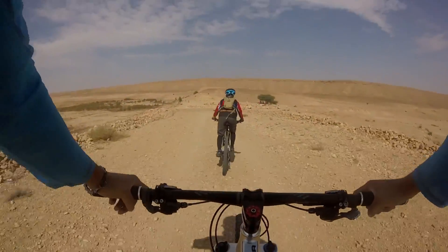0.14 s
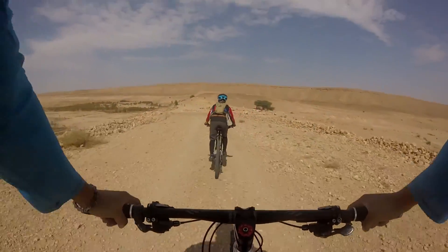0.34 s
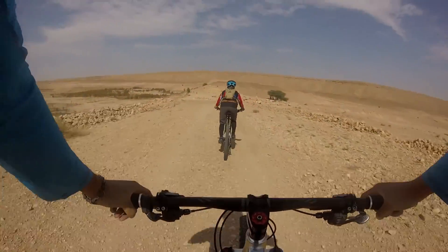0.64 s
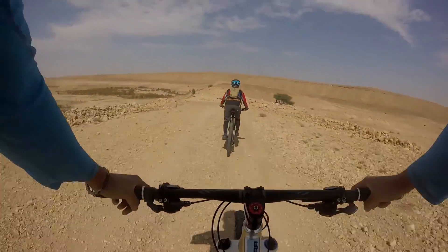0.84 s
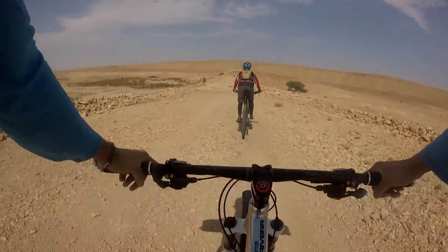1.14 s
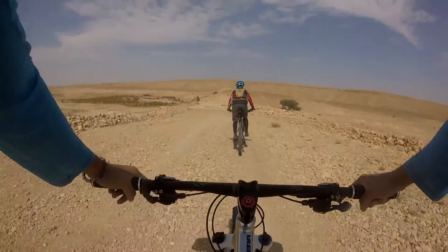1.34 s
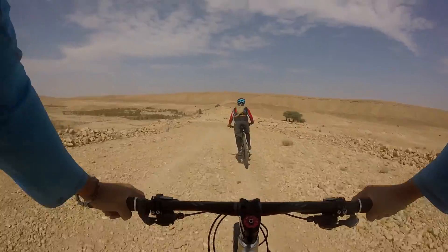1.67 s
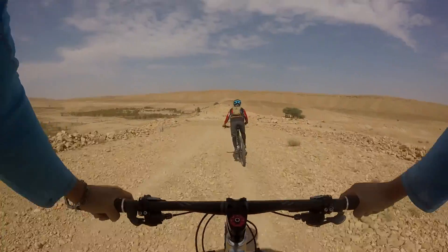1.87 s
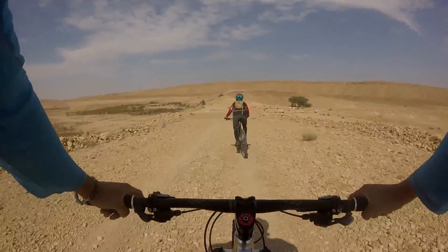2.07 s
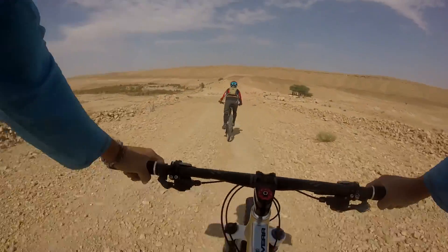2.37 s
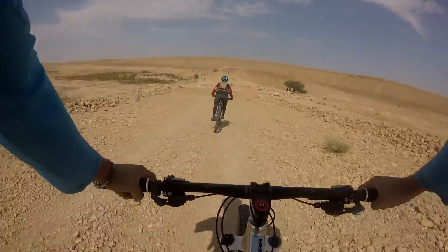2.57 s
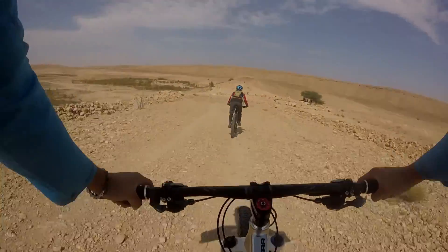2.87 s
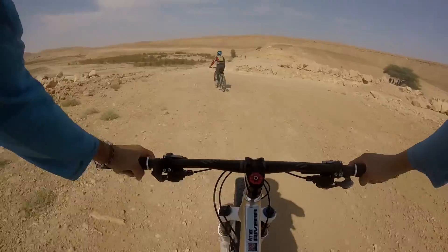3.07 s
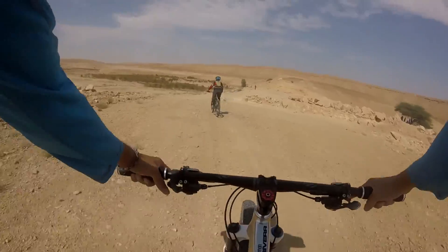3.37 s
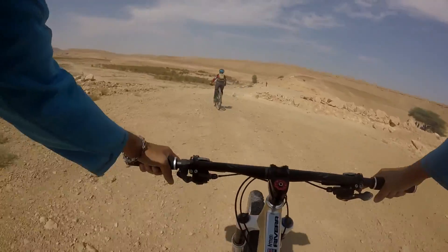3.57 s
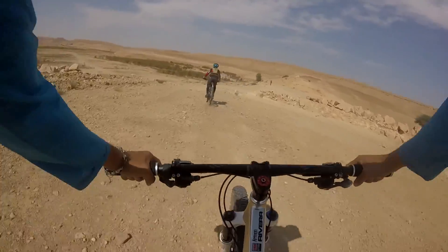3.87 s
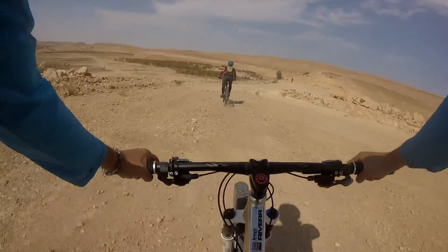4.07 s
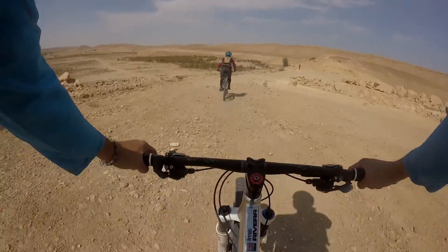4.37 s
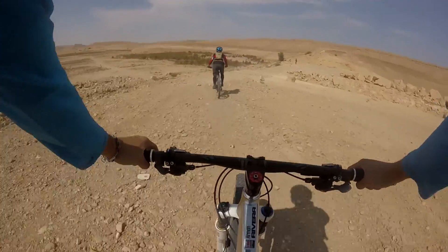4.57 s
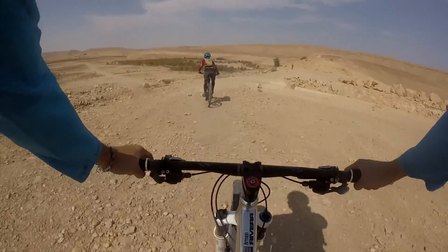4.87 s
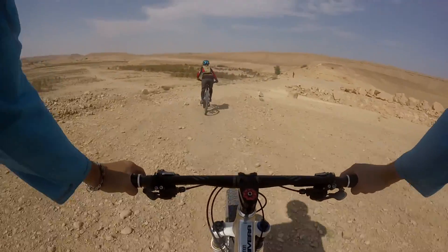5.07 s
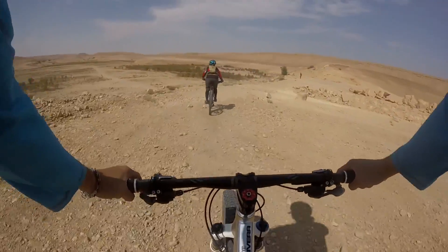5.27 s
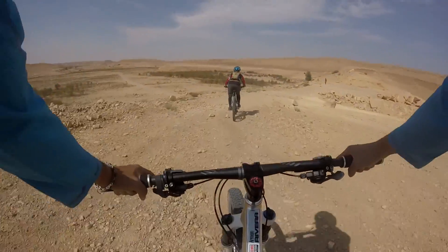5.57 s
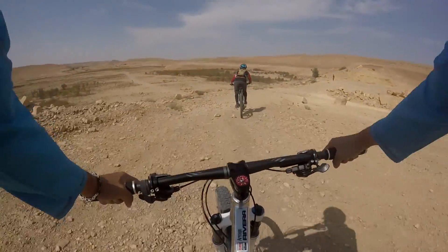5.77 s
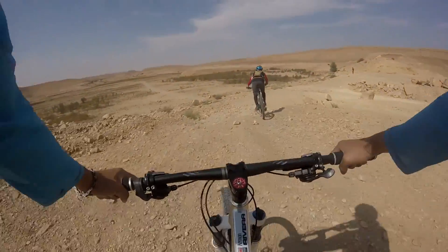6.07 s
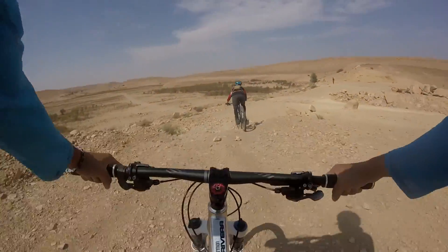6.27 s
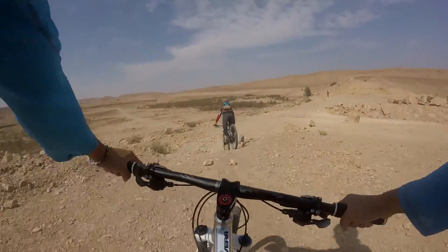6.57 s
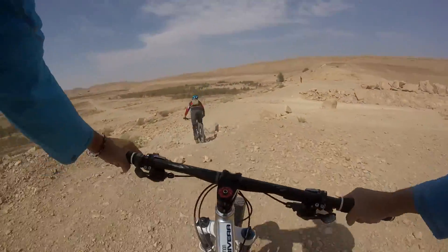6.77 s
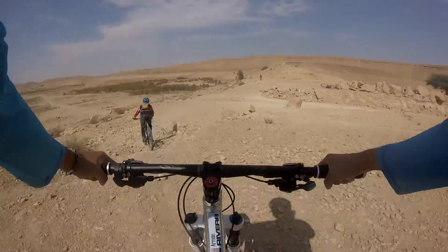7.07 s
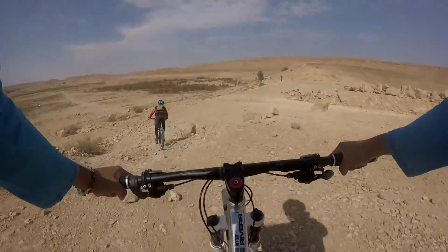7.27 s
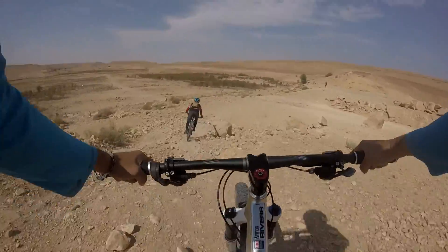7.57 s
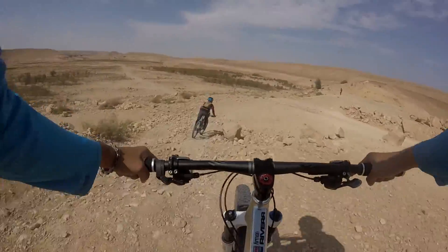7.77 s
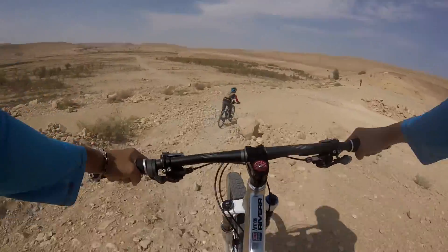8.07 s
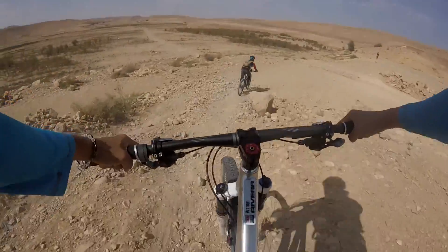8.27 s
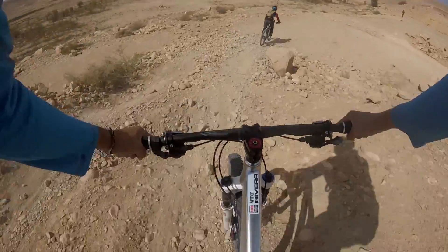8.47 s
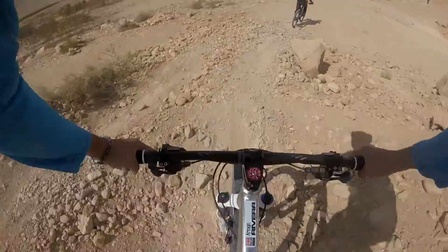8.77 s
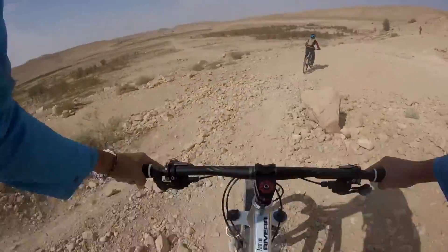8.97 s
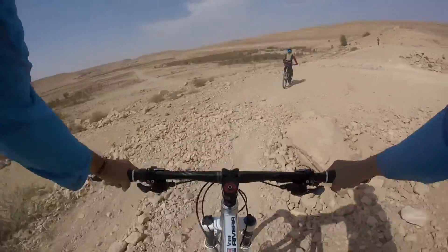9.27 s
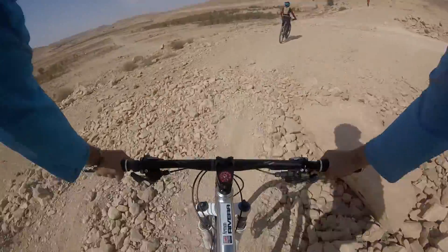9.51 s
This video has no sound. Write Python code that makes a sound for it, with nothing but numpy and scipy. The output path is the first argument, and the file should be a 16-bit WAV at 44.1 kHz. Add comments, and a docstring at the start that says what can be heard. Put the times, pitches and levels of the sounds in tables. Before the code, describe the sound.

Open desert, single channel, close chest camera in a housing, no echo. Low uneven wind buffets with fluttering edges run throughout, loudest in separate gusts. From 0 to 2.7 s tyres crunch and hiss over loose stones, with hollow knocks, a tight cluster near 1.4 s, and bright chain slaps around 0.3, 2.1 and 2.4 s. A grinding slide at 2.7-3.0 s ends in popping stones and one sharp click. Rapid ragged freehub ticks follow until 3.7 s; a hard knock lands at 3.45. Rolling continues with short scrapes near 4.6 s. Slower, clearer ticking spans 4.8-7.0 s, with wind mostly lulling from 5.3 and dense knocks, a snap and stone pops at 6.5-6.7. A faint high tone wavers from 5.2 to 8.3. Ticking resumes at 7.4-8.45 s under returning gusts. Strong wind near 8.9, dull blows, metal slaps and heavy knocks finish until about 9.6 s.

```python
"""Desert: a mountain bike rolls over loose stones, heard by a chest camera in its housing.
Wind: filtered noise and pressure spikes. Tyres, slides: damped-sine grains and patchy noise.
Knocks and blows: housing modes, noise thuds, brief pulses. Metal snaps: noise cracks and steel modes.
Freehub: ragged pawl bursts through hub-shell resonances while coasting.
Apart from these: a thin wavering tone and a single sharp click, a decaying one-sided step."""
import sys
import numpy as np
from scipy import signal
from scipy.fft import rfft, irfft, next_fast_len
from scipy.io import wavfile
from scipy.ndimage import uniform_filter1d, map_coordinates

SR = 44100
rng = np.random.default_rng(int(sys.argv[2]) if len(sys.argv) > 2 else 0)


def to_wav(sig):
    """Store sig (one row per channel, or 1-D mono) as 16-bit WAV at the path in sys.argv[1].

    Samples outside -1..1 are clipped; the rate is SR.
    """
    pcm = np.clip(np.atleast_2d(sig), -1, 1) * 32767
    pcm = np.round(pcm).astype(np.int16)
    wavfile.write(sys.argv[1], SR, pcm.T)  # frames by channels


N = 425124  # samples

# Wind course: start_s, buffet_db, flutter_db
WIND_COURSE = [(0.0, -18.5, -30), (0.08, -15, -42), (0.1, -16, -22.5), (0.19, -25.5, -33.5),
               (0.4, -31, -43), (0.48, -13, -29), (0.64, -16, -27.5), (0.72, -17.5, -25.5),
               (0.99, -26, -29), (1.1, -15, -25), (1.15, -19, -35), (1.82, -16, -28), (1.88, -23.5, -36.5),
               (2.04, -24.5, -31), (2.09, -18.5, -24), (2.2, -26, -36.5), (2.47, -14.5, -28),
               (2.6, -27.5, -38), (3.0, -14.5, -27), (3.25, -21.5, -38), (3.35, -11, -26.5),
               (3.44, -24, -29), (3.6, -18.5, -25), (3.73, -26, -40.5), (3.78, -15.5, -23),
               (4.11, -18, -25.5), (4.3, -20.5, -32.5), (4.45, -16, -23), (4.53, -22, -39),
               (4.62, -21, -33), (4.75, -11, -23.5), (4.86, -21.5, -33.5), (4.91, -27, -39),
               (4.99, -16.5, -25.5), (5.23, -24.5, -37), (5.31, -40, -62), (5.88, -30, -42.5),
               (5.98, -46, -62), (6.12, -17, -35.5), (6.2, -39, -49), (6.68, -22.5, -42),
               (7.09, -29, -49.5), (7.28, -21.5, -29.5), (7.43, -35.5, -50), (7.49, -11, -27),
               (7.6, -16.5, -19), (7.7, -24, -65), (7.76, -11, -25.5), (7.92, -26.5, -40.5),
               (8.03, -14, -28), (8.21, -14, -29), (8.31, -15.5, -18.5), (8.4, -19, -27.5),
               (8.59, -14.5, -22.5), (8.81, -16, -25), (8.86, -9, -19), (9.1, -30, -32.5),
               (9.15, -14, -22.5), (9.37, -16, -26.5), (9.64, -17, -33)]
# Wind spectra: freq_hz, gain_db
BUFFET_SPECTRUM = [(8, -5.5), (20, 0.5), (50, -7.5), (100, -16), (200, -30.5), (400, -105)]
FLUTTER_SPECTRUM = [(40, -9), (90, -5), (160, -4.5), (300, -10), (500, -20.5), (900, -29.5), (2000, -88)]
FLUTTER_DRIFT_DB = 1.5

# Tyre course: start_s, rumble_db, crunch_db
ROLL_COURSE = [(0.0, -35.5, -51), (0.4, -39, -47.5), (0.55, -32, -46), (0.8, -35, -47.5), (1.25, -33, -47),
               (1.5, -34, -48), (1.72, -33.5, -46.5), (2.01, -39.5, -49), (2.36, -33.5, -45.5),
               (2.7, -33, -43), (2.87, -31.5, -42), (3.01, -36.5, -54), (3.035, -33.5, -51),
               (3.23, -40.5, -52), (3.32, -37.5, -52.5), (3.6, -37.5, -50.5), (3.86, -32, -45.5),
               (4.35, -37.5, -51), (4.53, -40, -50), (4.7, -41, -48), (4.97, -42.5, -56.5),
               (5.31, -46, -52.5), (5.8, -38.5, -50.5), (6.1, -42.5, -48.5), (6.4, -39, -49.5),
               (6.74, -35.5, -47), (6.93, -39.5, -47.5), (7.36, -38, -48.5), (8.08, -38, -46),
               (8.3, -38, -50.5), (8.42, -49, -62), (8.5, -35, -47.5), (8.62, -43.5, -52.5),
               (8.93, -35, -47.5), (9.1, -36, -46), (9.17, -34.5, -46.5), (9.64, -40, -51)]
# Contact spectra, low housing ring to high hiss: freq_hz, gain_db
HOUSING_SPECTRUM = [(200, -9.5), (450, -1), (800, -2.5), (1020, -1.5), (1180, 1.5), (1320, -1.5),
                    (1480, -8.5), (1800, -20.5), (2600, -57), (5000, -100)]
GRAVEL_SPECTRUM = [(500, -88), (1100, 11.5), (1700, 5), (2400, 2.5), (3200, 1), (3700, -2), (4200, -14.5),
                   (6000, -16), (12000, -79)]
GRIT_SPECTRUM = [(1200, -90), (2500, -41), (4200, 4), (5600, -1), (6300, 1), (7600, -2), (8900, 0.5),
                 (10000, -2), (12300, -4), (13200, -8), (15000, -12), (15700, -60)]
GRIT_DB, GRIT_FOLLOWS = -61.5, 1  # mean level; share of the crunch's swings followed

# Stones and jolts: start_s, level_db, pitch_hz, crack_db (over level), t60_s (thud, crack; scales ring)
KNOCK_EVENTS = [(0.187, -14, 760, -13, 0.011), (0.208, -15.5, 800, -20, 0.02),
                (0.384, -23.5, 1210, -11, 0.027), (0.488, -20, 760, -5, 0.024),
                (0.533, -19.5, 800, -4.5, 0.023), (0.919, -20.5, 1280, -5, 0.022),
                (0.9409, -20, 1030, -7, 0.027), (1.35, -27, 1160, -32, 0.033),
                (1.3822, -13.5, 900, -13, 0.024), (1.386, -10, 1120, -14, 0.021),
                (1.392, -18.5, 1240, -5, 0.04), (1.469, -10.5, 995, -12.5, 0.034),
                (1.4795, -14, 1210, -18, 0.018), (1.543, -11, 1180, -14, 0.022),
                (1.882, -16.5, 590, -22, 0.017), (2.022, -17, 920, -21, 0.023),
                (2.22, -15, 1118, -8, 0.029), (2.375, -17.5, 1260, -23, 0.018),
                (2.458, -19, 1020, -20, 0.022), (2.547, -15, 1000, -25, 0.023),
                (2.616, -21.5, 1200, -8.5, 0.068), (2.808, -23, 730, -14, 0.03),
                (3.199, -23, 1230, -19, 0.022), (3.448, -6.5, 1204, -17, 0.014),
                (4.316, -18.5, 1170, -13, 0.021), (4.38, -15.5, 1200, -12.5, 0.024),
                (4.438, -21, 1140, -8, 0.037), (4.52, -19, 1280, -22, 0.039),
                (4.573, -20, 1200, -17, 0.042), (4.607, -18, 1260, -25, 0.025),
                (4.878, -23.5, 1190, -25, 0.032), (4.905, -23, 1260, -28, 0.04),
                (5.037, -9, 1165, -23, 0.038), (5.077, -21.5, 616, -8, 0.019),
                (5.175, -21.5, 1125, -16, 0.025), (5.752, -17.5, 700, -5, 0.018),
                (6.251, -18, 1330, -10, 0.015), (6.271, -14.5, 717, -9, 0.013),
                (6.494, -19, 630, -14, 0.053), (6.563, -9.5, 1120, -20, 0.023), (6.592, -19, 990, -6, 0.02),
                (6.608, -20, 790, -4, 0.04), (6.65, -25, 1230, -4, 0.024), (6.673, -21, 1090, -2, 0.027),
                (6.694, -24, 696, 0, 0.019), (6.963, -21, 1155, -14, 0.038), (7.021, -24.5, 990, -3, 0.034),
                (7.152, -23.5, 570, -6.5, 0.071), (7.284, -17, 1050, -13, 0.024),
                (7.307, -7.5, 1125, -12, 0.02), (7.353, -18, 550, -14, 0.047),
                (7.377, -15.5, 1185, -22, 0.025), (7.959, -21, 1280, -7, 0.021),
                (8.13, -23, 1030, -16, 0.024), (8.183, -22.5, 1085, 3, 0.019),
                (8.29, -13.5, 780, -15, 0.03), (8.291, -19, 1257, -23, 0.05),
                (8.605, -16.5, 1070, -9, 0.029), (8.662, -20.5, 1030, -11, 0.026),
                (8.921, -26, 1220, 2, 0.06), (8.947, -14.5, 1085, -17, 0.034),
                (9.0455, -9.5, 1110, -22, 0.051), (9.048, -16.5, 660, -21, 0.085),
                (9.281, -13, 1080, -13.5, 0.025), (9.423, -10, 1070, -20, 0.028)]
# Housing modes rung by every knock: mode_hz, level_db (over knock level), t60_s
PANEL_MODES = [(654, -23, 0.093), (1267, -11, 0.029)]
RING_DB, THUD_DB = -5.5, 18.5  # over knock level
THUD_FOLLOWS = 0.7  # thud dB per dB of crack
SWELL = 0.095  # ring's time to peak, share of t60_s

# Metal on metal: start_s, level_db, tilt_db (per octave on the ring; gain on the crack)
SNAP_EVENTS = [(0.315, -13.5, 9.5), (0.6325, -17.5, 1), (1.411, -24.5, -14), (1.5635, -17, -2),
               (1.8442, -29, -13), (2.026, -29, -9), (2.128, -12, 6), (2.376, -11, 6), (3.3802, -34, 0),
               (3.7913, -13, -8), (3.8312, -31, 0), (4.1215, -29, -1), (4.4088, -31, -2), (4.519, -34, 0),
               (6.4842, -12, -1), (8.2931, -28, -11), (8.607, -13, 1), (8.9471, -27, -13),
               (9.0565, -15.5, -2), (9.549, -33, -5)]
# Steel modes: mode_hz, level_db, t60_s
STEEL_MODES = [(2280, -48, 0.0071), (4800, -20, 0.0091), (5540, -18.5, 0.021), (6230, -11.5, 0.014),
               (8890, -12.5, 0.014), (11100, -17, 0.014), (12700, -21, .016), (14900, -29, .01)]
SNAP_BODY_DB, SNAP_BODY_HZ, SNAP_BODY_T60_S = -11, 1230, 0.017  # housing answers each snap

# Small stones cracking under the tread: start_s, level_db
CHIP_EVENTS = [(0.504, -26.5), (0.652, -26), (0.7526, -26), (1.288, -29), (1.312, -38), (2.273, -27),
               (2.395, -24), (3.18, -30), (3.306, -31), (4.4285, -33), (5.593, -26), (6.2815, -22.5),
               (6.538, -22), (6.573, -23), (6.765, -22), (7.289, -24), (7.797, -26), (7.824, -25),
               (8.131, -22), (8.152, -28), (8.6613, -34), (8.901, -26), (8.9633, -25), (9.4128, -27)]
# Tyre slides: start_s, end_s, rumble_db, crunch_db (over rumble)
SCRUB_EVENTS = [(2.73, 3.003, -36.5, -3.5), (3.01, 3.028, -29, -7), (3.718, 3.816, -31, -8.5),
                (4.233, 4.347, -37.5, -6), (4.537, 4.555, -32.5, -24), (4.605, 4.636, -25.5, -17.5),
                (4.67, 4.72, -26, -12), (4.888, 4.926, -32, -24), (5.757, 5.773, -31, -14),
                (6.29, 6.333, -31.5, -8), (6.468, 6.518, -31, -6), (6.572, 6.615, -29, -12),
                (7.153, 7.19, -38, -8), (7.205, 7.247, -30, -13), (7.968, 8.005, -37.5, 2)]
SPRAY_DB, SPRAY_DB_PER_S = -21, 36  # grit over crunch at slide start; its rise

# Dull blows on the port: start_s, level_db, pitch_hz
THUMP_EVENTS = [(0.722, -17.5, 270), (0.808, -14, 167), (1.108, -15.5, 368), (3.89, -11, 220),
                (4.21, -18, 150), (7.158, -21, 320), (8.05, -15, 230), (8.717, -13, 142), (9.147, -14, 183)]
# Stones shot from under the tread: start_s, level_db, pitch_hz
POP_EVENTS = [(0.94, -5, 1010), (3.008, -9, 1170), (3.02, -21, 1200), (3.026, -14.5, 1080),
              (5.419, -24, 1180), (6.4935, -11.5, 910), (6.6062, -3.5, 870), (6.868, -19, 1050),
              (7.018, -14.5, 1100)]
THUMP_CYCLES, POP_CYCLES = 1.06, 0.69  # half-lengths
THUMP_EDGE_DB, POP_EDGE_DB = -9, -10.5  # sharp overtones

# Single sharp click, a one-sided step: start_s, peak_db
STEP_CLICK = [(3.004, -13)]

# Wheel turning against the freehub, one table per coast: time_s, teeth_passed
COAST_TURNS = [
    [(3.06, 0), (3.381, 21), (3.524, 30), (3.692, 41)],
    [(4.765, 0), (4.94, 4), (5.164, 11), (5.235, 13), (5.558, 21), (5.809, 28), (5.989, 34), (6.17, 42),
     (6.23, 44), (6.272, 45), (6.435, 48), (6.564, 51), (6.747, 56), (6.859, 60), (7.002, 67), (7.029, 68)],
    [(7.369, 0), (7.471, 3), (7.666, 10), (7.756, 13), (7.887, 17), (8.0, 21), (8.069, 23), (8.285, 30),
     (8.453, 35)],
]
# Tick course: time_s, level_db
TICK_COURSE = [(3.06, -50), (3.45, -47.5), (3.7, -46.5), (4.76, -48), (5.1, -45), (5.55, -39.5), (8.2, -39),
               (8.4, -47)]
# Hub-shell resonances: centre_hz, width_hz, gain_db
HUB_MODES = [(3130, 190, 0.5), (4640, 59, 5.5), (5980, 51, 6.5), (8930, 190, 1.5), (9770, 87, 7),
             (12600, 120, -5), (13600, 110, 2), (14700, 300, 1)]
TICK_SCATTER_DB, TICK_JITTER_S, TICK_TINT_DB = 2.2, 0.0012, 3.5  # tint: patches in time and frequency
# Thin tone: start_s, end_s, level_db
WHISTLE_SPAN = (5.2, 8.3, -75)
WHISTLE_HZ = 9651
TOP_HZ = 16478


def amp(db):
    """Gain of a level in dB."""
    return 10 ** (np.asarray(db) / 20)


def unit(x):
    """x at rms 1."""
    return x / np.sqrt(np.mean(x ** 2) + 1e-20)


def curves(rows):
    """One value per sample for each column after the time."""
    s, *cols = np.transpose(rows)
    return [np.interp(np.arange(N) / SR, s, c) for c in cols]


def wobble(rate):
    """Smooth random curve, rate knots a second."""
    knots = rng.standard_normal(int(N * rate / SR) + 4)
    return map_coordinates(knots, [np.arange(N) * rate / SR])


def add_at(track, start_s, sound):
    """Add sound to track from start_s."""
    track[round(start_s * SR):][:len(sound)] += sound


def filtered(x, response):
    """x times a response of frequency."""
    m = next_fast_len(N + 8192)
    return irfft(rfft(x, m) * response(np.fft.rfftfreq(m, 1 / SR)), m)[..., :N]


def coloured(x, points):
    """x through (Hz, dB) points joined on a log axis."""
    f, db = np.transpose(points)
    return filtered(x, lambda hz: amp(np.interp(np.log(hz + 1), np.log(f), db)))


def even(x, seconds):
    """x with its swells slower than the given time taken out."""
    size = round(seconds * SR)
    power = uniform_filter1d(uniform_filter1d(x * x, size), size)
    return x / np.sqrt(np.abs(power) + 1e-12)


def patchy(depth_db):
    """Noise whose level drifts separately in small patches of time and frequency."""
    z = signal.stft(rng.standard_normal(N), nperseg=256)[2]
    field = uniform_filter1d(rng.standard_normal(z.shape), size=6, axis=0)
    field = uniform_filter1d(field, size=8, axis=1)
    return signal.istft(z * amp(depth_db * unit(field)), nperseg=256)[1][:N]


def grains(count, hz, octaves, cycles, spread_db):
    """Stone contacts: damped sines of scattered pitch and size at random moments."""
    s, size = rng.random((count, 2)).T
    pitch = np.clip(hz * 2 ** (octaves * rng.standard_normal(count)), 200, 16000)[:, None]
    k = np.arange(400)
    phase = pitch * k / SR  # turns
    size = amp(np.minimum(-spread_db * np.log(1 - size), 15))[:, None]
    wave = size * np.sin(2 * np.pi * phase) * np.exp(-phase / cycles)
    places = (s * N).astype(int)[:, None] + k
    return unit(np.bincount(places.ravel(), wave.ravel())[:N])


def slaps(count):
    """Single eddies bursting on the port: lone broadband pressure spikes, mostly pushes."""
    s, size, side = rng.random((count, 3)).T
    push = np.where(side < .65, 1, -1) * amp(np.minimum(-4.5 * np.log(1 - size), 12))
    return np.bincount((s * N).astype(int), push, N)


def wind():
    """Eddies push slowly on the port in separate buffets; sharper ones flutter in lumps on top."""
    buffet_db, flutter_db = curves(WIND_COURSE)
    eddies, bursts = wobble(25), unit(slaps(count=260))
    buffet = amp(4.06 * eddies) * rng.standard_normal(N) + 0.84 * bursts
    flutter = amp(4.1 * eddies + 1.5 * wobble(45)) * rng.standard_normal(N) + 0.18 * bursts
    buffet = even(coloured(buffet, BUFFET_SPECTRUM), 0.085)
    flutter = even(coloured(flutter, FLUTTER_SPECTRUM), 0.06)
    flutter_gain = amp(flutter_db + 2.0 + FLUTTER_DRIFT_DB * wobble(14))
    return amp(buffet_db + 0.5) * buffet + flutter_gain * flutter


def tyres():
    """Stones shift under the tread in clumps: low ones ring the housing, small ones crunch, grit hisses."""
    rumble_db, crunch_db = curves(ROLL_COURSE)
    grit_db = GRIT_DB + GRIT_FOLLOWS * (crunch_db - crunch_db.mean())
    clumps, bursts = np.clip(wobble(22), -2.2, 1.4), np.clip(wobble(75), -2.2, 1.6)

    def contact(depth_db, stones, stone_gain, spectrum):
        """Patchy noise plus grains, both through one spectrum."""
        bed = unit(coloured(patchy(depth_db), spectrum))
        return bed + stone_gain * unit(coloured(stones, spectrum))

    big = grains(count=2500, hz=921, octaves=0.6, cycles=1.26, spread_db=0.5)
    small = grains(count=3000, hz=2640, octaves=0.42, cycles=1.7, spread_db=8.5)
    fine = grains(count=8000, hz=7470, octaves=0.58, cycles=3.5, spread_db=3.5)
    rumble = contact(3.0, big, 1.21, HOUSING_SPECTRUM)
    crunch = contact(2.5, small, 0.83, GRAVEL_SPECTRUM)
    grit = contact(3.0, fine, 0.73, GRIT_SPECTRUM)
    rumble = amp(rumble_db) * unit(amp(2.38 * clumps + 1.8 * bursts) * rumble)
    crunch = amp(crunch_db) * unit(amp(2.0 * clumps + 1.0 * bursts + 0.25 * wobble(4.7)) * crunch)
    grit = amp(grit_db) * unit(amp(1.95 * clumps + 1.77 * bursts) * grit)
    return rumble + crunch + grit


def knocks():
    """Each jolt rings the housing briefly at its own pitch, over a broad rough thud and a short crack."""
    ring, thud, crack = np.zeros((3, N + SR))
    t = np.arange(SR // 10) / SR
    for s, db, hz, crack_db, t60 in KNOCK_EVENTS:
        wander = np.cumsum(rng.standard_normal(len(t))) * 0.064  # unclean contact: phase drifts
        rise = t / (SWELL * t60)
        swell = (rise * np.exp(1 - rise)) ** 1.62
        add_at(ring, s, amp(db + RING_DB) * swell * np.sin(2 * np.pi * hz * t + wander))
        for mode_hz, level_db, life_s in PANEL_MODES:
            mode_gain = amp(db + level_db + rng.normal(0, 1.0) - 60 * t / life_s)
            add_at(ring, s, mode_gain * np.sin(2 * np.pi * mode_hz * t))
        shape = amp(-60 * t / t60) * (1 - np.exp(-t / 0.00086)) ** 2
        thud_gain = amp(db + THUD_DB + THUD_FOLLOWS * crack_db)
        add_at(thud, s, thud_gain * shape * rng.standard_normal(len(t)))
        add_at(crack, s, amp(db + crack_db) * shape * rng.standard_normal(len(t)))
    dull_ring = filtered(ring[:N], lambda hz: 1 / (1 + (hz / 1900) ** 4))
    return dull_ring + coloured(thud[:N], HOUSING_SPECTRUM) + coloured(crack[:N], GRAVEL_SPECTRUM)


def snaps():
    """Chain and cables strike the frame: dry crack, short steel modes, rough tail and a housing ring."""
    metal, body = np.zeros((2, N + SR))
    t = np.arange(SR // 16) / SR
    for s, db, tilt_db in SNAP_EVENTS:
        ring = np.zeros(len(t))
        for hz, level_db, t60 in STEEL_MODES:
            mode_db = level_db + rng.normal(0, 2.5) + tilt_db * np.log2(hz / 7000)
            ring += amp(mode_db - 60 * t / t60) * np.sin(2 * np.pi * hz * t)
        rough, sharp = rng.standard_normal((2, len(t)))
        tail = 0.29 * amp(-60 * t / 0.032) * uniform_filter1d(rough, size=3)
        crack = 0.23 * amp(tilt_db - 60 * t / 0.0078) * np.diff(sharp, prepend=0)
        add_at(metal, s, amp(db) * (ring + tail + crack))
        body_gain = amp(db + SNAP_BODY_DB - 60 * t / SNAP_BODY_T60_S)
        add_at(body, s, body_gain * np.sin(2 * np.pi * SNAP_BODY_HZ * t))
    return coloured(metal[:N], [(300, -25), (1200, 4.0), (14800, -9), (16400, -27)]) + body[:N]


def chips():
    """Small stones crack under the tread: short decaying noise through the gravel spectrum."""
    out, t = np.zeros(N + SR), np.arange(SR // 30) / SR
    for s, db in CHIP_EVENTS:
        shape = amp(db - 60 * t / 0.027) * (1 - np.exp(-t / 0.0005))
        add_at(out, s, shape * rng.standard_normal(len(t)))
    return coloured(out[:N], GRAVEL_SPECTRUM)


def blips(rows, cycles, edge_db):
    """Brief pulses of a cycle or two that swell and fade alike, with a sharper overtone in the middle."""
    half = SR // 25
    out, t = np.zeros(N + SR), np.arange(-half, half) / SR
    for s, db, hz in rows:
        turns = hz * t
        pulse = np.exp(-(turns / cycles) ** 2) * np.cos(2 * np.pi * turns)
        edge = amp(edge_db) * np.exp(-(2 * turns / cycles) ** 2) * np.cos(2 * np.pi * 2.0 * turns)
        out[round(s * SR) - half:][:len(t)] += amp(db) * (pulse + edge)
    return out[:N]


def thumps():
    """Dull blows on the port: low pulses."""
    return blips(THUMP_EVENTS, THUMP_CYCLES, THUMP_EDGE_DB)


def pops():
    """Stones shoot from under the tread: pulses of about a cycle."""
    return blips(POP_EVENTS, POP_CYCLES, POP_EDGE_DB)


def scrubs():
    """A sliding tyre grinds stones in a dense burst that swells and stops short."""
    level, time = np.zeros((3, N)), np.arange(N) / SR
    for start, end, db, crunch_db in SCRUB_EVENTS:
        spray_db = SPRAY_DB + SPRAY_DB_PER_S * np.clip(time - start, 0, end - start)
        over_rumble = [np.ones(N), amp(crunch_db) * np.ones(N), amp(crunch_db + spray_db)]
        corners_s = [start - .015, start + 0.0088, end - .006, end + 0.0058]
        level += amp(db) * np.array(over_rumble) * np.interp(time, corners_s, [0.013, 0.61, 1.0, 0.0064])
    rough = amp(1.76 * wobble(110))
    big = grains(count=9000, hz=1150, octaves=0.38, cycles=0.68, spread_db=1.0)
    small = grains(count=14000, hz=2740, octaves=0.51, cycles=1.2, spread_db=3.0)
    rumble, crunch = coloured(big, HOUSING_SPECTRUM), coloured(small, GRAVEL_SPECTRUM)
    spray = coloured(rng.standard_normal(N), GRIT_SPECTRUM)
    return sum(gain * unit(rough * part) for gain, part in zip(level, (rumble, crunch, spray)))


def step_click():
    """Single sharp click: a one-sided step that dies in milliseconds."""
    out, t = np.zeros(N + SR), np.arange(SR // 16) / SR
    for s, db in STEP_CLICK:
        add_at(out, s, amp(db - 60 * t / 0.004))
    return out[:N]


def freehub():
    """The pawls drop one just after another: each tick is a short ragged burst ringing the hub shell."""
    burst, t = np.zeros(N + SR), np.arange(SR // 12) / SR
    coasts = [np.transpose(rows) for rows in COAST_TURNS]
    times = np.concatenate([np.interp(np.arange(n[-1] + 1), n, s) for s, n in coasts])  # a tick a tooth
    late, size, width = rng.standard_normal((len(times), 3)).T
    levels_db = np.interp(times, *np.transpose(TICK_COURSE)) + TICK_SCATTER_DB * size
    spreads_s = 0.0078 * amp(1.5 * width)  # first to last pawl
    for s, db, spread in zip(times + TICK_JITTER_S * late, levels_db, spreads_s):
        landing = (1 - np.exp(-t / 0.00054)) / (1 + np.exp((t - spread) / 0.0017))
        add_at(burst, s, amp(db) * (landing + 0.37 * amp(-60 * t / 0.045)))

    def shell(f):
        """Direct path plus band-pass resonances."""
        return 1 + sum(amp(db) * 1j * f * w / (c * c - f * f + 1j * f * w) for c, w, db in HUB_MODES)

    ragged = amp(1.8 * wobble(400)) * patchy(depth_db=TICK_TINT_DB)
    ticks = filtered(burst[:N] * ragged, shell)
    return coloured(ticks, [(1200, 3.5), (2800, -1.0), (5000, -11.5), (14800, -15.5), (15600, -48)])


def whistle():
    """Thin high sine, wavering in level and phase."""
    start, end, db = WHISTLE_SPAN
    time = np.arange(N) / SR
    fade = np.interp(time, [start, start + .3, end - .3, end], [0, 1, 1, 0])
    gain = amp(db + 2.7 * wobble(3.5) + 3 * wobble(40)) * fade
    return gain * np.sin(2 * np.pi * WHISTLE_HZ * time + 0.94 * wobble(30))


def scene():
    """Everything is summed to one channel."""
    ground = tyres() + chips() + pops() + scrubs()
    bike = snaps() + freehub()
    return (wind() + knocks() + thumps() + ground + bike + step_click() + whistle())[None]


def record(dry):
    """The camera rounds off the strongest gusts and keeps nothing above its band limit."""
    soft = dry / (1 + np.abs(dry / 0.8) ** 4) ** (1 / 4)
    return filtered(soft, lambda hz: hz < TOP_HZ)


dry = scene()
out = record(dry)
to_wav(out)
```